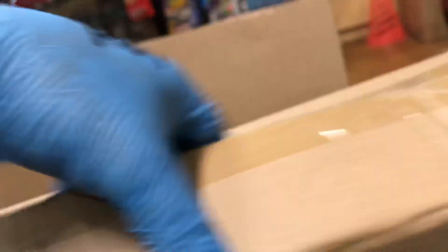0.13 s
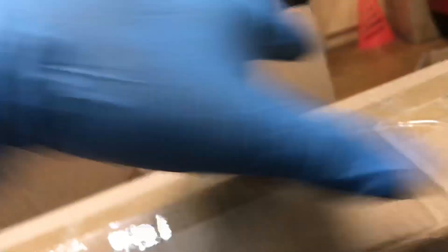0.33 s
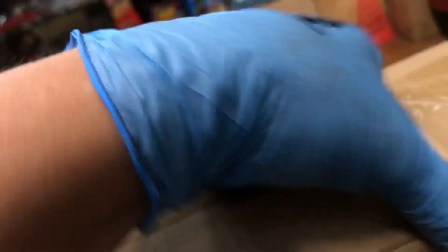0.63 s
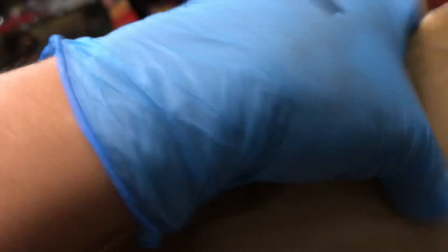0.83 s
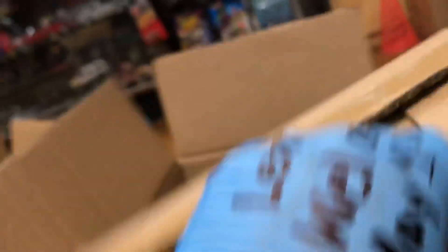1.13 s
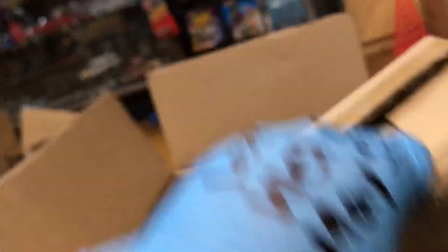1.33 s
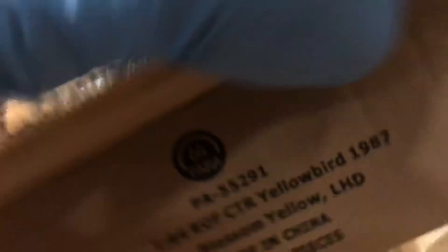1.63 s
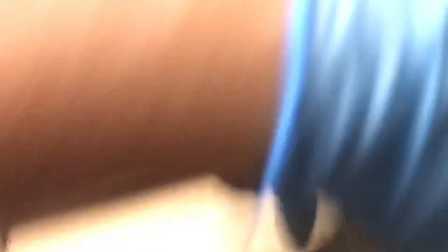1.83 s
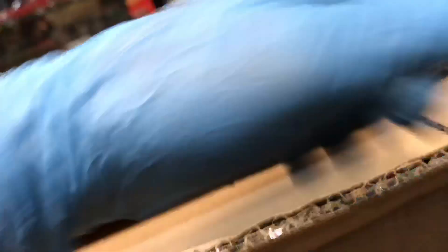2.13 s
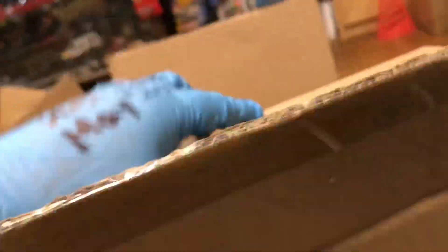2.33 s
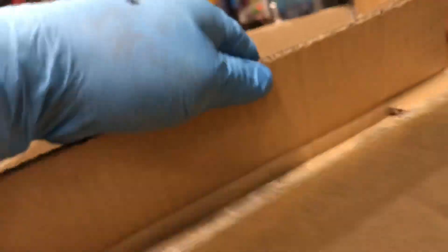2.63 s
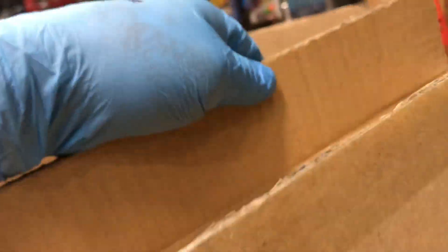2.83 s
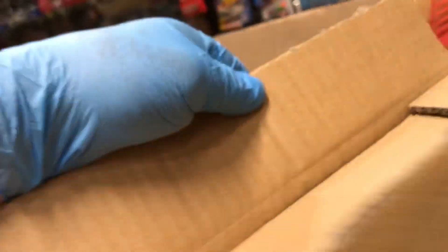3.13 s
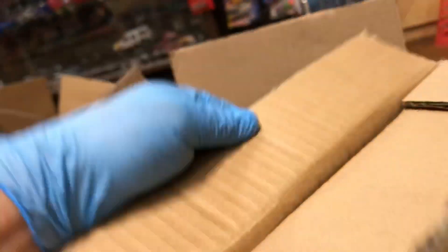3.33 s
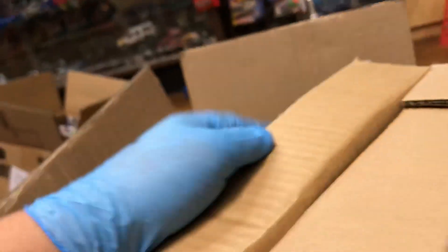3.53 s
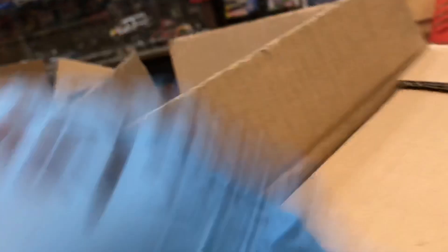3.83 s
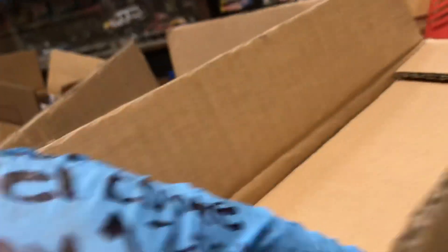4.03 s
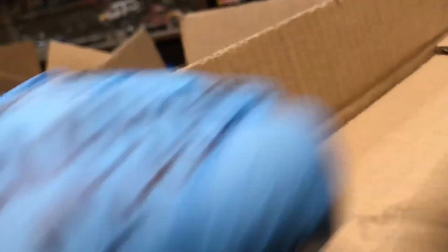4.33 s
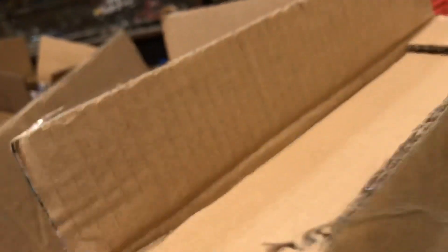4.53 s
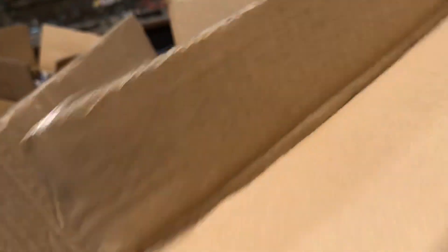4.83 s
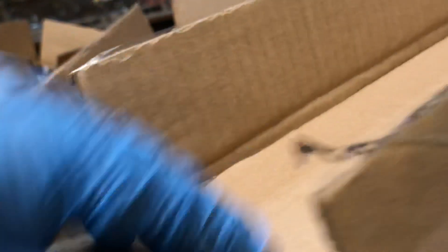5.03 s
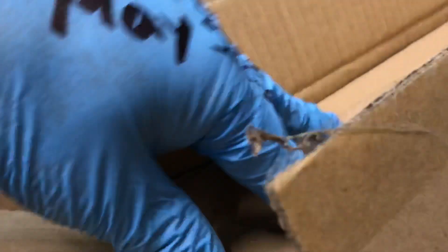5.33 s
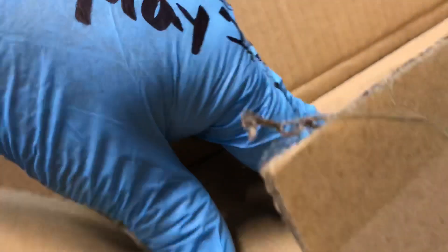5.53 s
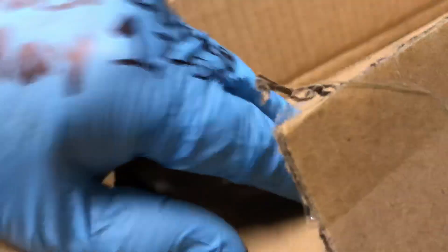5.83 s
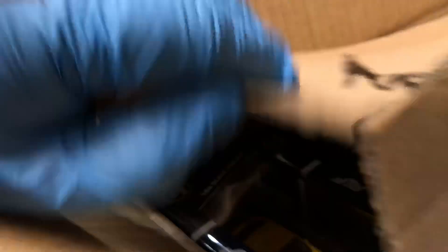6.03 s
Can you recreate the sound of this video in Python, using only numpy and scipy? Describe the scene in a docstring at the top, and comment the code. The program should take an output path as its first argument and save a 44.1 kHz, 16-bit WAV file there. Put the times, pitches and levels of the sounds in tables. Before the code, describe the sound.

Very close, dry mono sound of rubber gloves handling a cardboard carton in a quiet indoor room. Fast rubbing strokes come with hollow low knocks and papery snaps, strongest near one and two seconds. Short rubbery squeaks and softer slides follow, with small gaps. A loud, bright scrape bursts out after four seconds, then lighter scuffs and a final hissing rub. Faint air noise and low hum remain underneath.

```python
"""Gloved hands in a cardboard carton

Gloved hands work through a cardboard carton close to the microphone, in a quiet room.
Rubber slides over the board as a dense hiss of tiny catches; the walls rumble and thump at their modes.
Tape and creases snap as short noise bursts, and a sticking, slipping finger squeaks in gliding tones.
Faint ticks of relaxing creases, a short room tail, air noise and a low hum lie under it all."""
import sys
import numpy as np
from scipy import signal
from scipy.io import wavfile
from scipy.ndimage import uniform_filter1d

SR = 44100
rng = np.random.default_rng(int(sys.argv[2]) if len(sys.argv) > 2 else 0)


def put_to_file(sound):
    """Save the sound as 16-bit audio at rate SR, in the file named by the first command-line argument."""
    columns = np.atleast_2d(sound).T  # one column per channel
    safe = np.clip(columns, -1, 1)
    whole_steps = np.round(safe * 32767)
    wavfile.write(sys.argv[1], SR, whole_steps.astype(np.int16))


N = 272273   # samples

# air noise of the room, relative spectrum: pitch_hz, level_db per Hz
AIR_SPECTRUM = [(18, -41.5), (30, -8.5), (139, 1.5), (181, -13), (268, -13), (493, -27), (1240, -23),
                (1490, -30), (1940, -25.5), (15200, -32.5), (16500, -37)]
# steady hum tones ahead of the microphone: pitch_hz, rms_db
HUM_TONES = [(59, -63), (119, -60.5)]
# modes of the carton walls: pitch_hz, t60_s, gain_db
WALL_MODES = [(54.6, 0.064, 0.5), (80.4, 0.077, 1), (137.2, 0.064, 1), (197, 0.057, -4),
              (252.7, 0.036, -1.5), (305, 0.038, 1.5), (376, 0.043, -1.5), (500, 0.02, -8), (690, .05, -24),
              (950, .04, -17.5)]
# shoves against the walls: strongest_s, drive_db, held_s
SHOVES = [(0.0, -46, .1), (0.2, -24, .07), (0.32, -31, .02), (0.39, -40, .07), (0.57, -29, .01),
          (0.63, -35, .02), (0.7, -26, .04), (0.82, -35, .03), (0.89, -19, .05), (0.99, -27, .01),
          (1.06, -30, .06), (1.17, -28, .005), (1.262, -18, .03), (1.46, -15, .02), (1.35, -33, .06),
          (1.56, -33, .06), (1.8, -41, .01), (1.84, -24, .06), (1.94, -13, .05), (2.07, -29, .06),
          (2.2, -38, .04), (2.37, -25, .02), (2.46, -31, .01), (2.52, -33, .06), (2.65, -39, .03),
          (2.71, -33, .04), (3.33, -45, .02), (3.5, -30, .01), (3.6, -40, .03), (3.8, -36, .005),
          (3.93, -36, .005), (4.13, -42, .24), (4.4, -37, .03), (4.54, -41, .25), (4.83, -39, .08),
          (5.02, -22, .02), (5.16, -37, .04), (5.24, -29, .01), (5.32, -40, .06), (5.45, -34, .01),
          (5.53, -35, .005), (5.91, -42, .2), (6.14, -28, .005)]
# bumps on the walls: start_s, drive_db, struck_pitch_hz, contact_s
BUMPS = [(0.191, -21.5, 93, 0.0011), (0.231, -16.5, 172, 0.0029), (0.258, -19, 70.0, 0.0014),
         (0.282, -20.5, 110, 0.0016), (0.31, -21, 51.1, 0.002), (0.519, -22.5, 96, 0.0038),
         (0.553, -20, 148, 0.0015), (0.59, -25.5, 91.5, 0.0022), (0.695, -17.5, 283, 0.00069),
         (0.861, -9.5, 132, 0.004), (0.881, 2, 189, 0.0022), (0.908, -28, 124, 0.0023),
         (0.95, -10.5, 76.4, 0.0014), (0.977, -10.5, 66, 0.0022), (1.16, -17, 86.1, 0.0036),
         (1.256, -11, 91.5, 0.0021), (1.281, -15, 137, 0.0047), (1.446, -14, 147, 0.0018),
         (1.469, -21, 149, 0.0016), (1.834, -21.5, 103, 0.0032), (1.895, -8.5, 360, 0.0015),
         (1.912, -11, 168, 0.0015), (1.938, -6.5, 188, 0.0018), (1.948, -7.5, 93.5, 0.0018),
         (1.962, -9, 110, 0.0018), (1.983, -11.5, 86.1, 0.0024), (2.005, -15, 83.4, 0.002),
         (2.1, -27, 114, 0.0023), (2.368, -15, 270, 0.0018), (2.3755, -12, 170, 0.002),
         (2.442, -19.5, 91.5, 0.0018), (2.578, -25, 66.6, 0.0026), (3.254, -33, 334, 0.0012),
         (3.792, -20, 124, 0.00067), (3.921, -22, 130, 0.0013), (3.939, -19, 68, 0.0011),
         (3.979, -15.5, 124, 0.0033), (5.017, -19, 56.5, 0.0017), (5.045, -22, 51.4, 0.0033),
         (5.07, -13.5, 61, 0.003), (5.231, -19, 230, 0.0013), (5.416, -30, 156, 0.0019),
         (6.137, -32, 69.5, 0.002)]
# snaps and scuffs of tape and creases: start_s, peak_db, centre_hz, t60_s, bright_crack_db (gain)
SNAPS = [(0.084, -16, 1100, 0.017, -13), (0.232, -21, 710, 0.025, -35), (0.312, -18.5, 5950, 0.023, 7),
         (0.511, -26.5, 1090, 0.019, -6), (0.559, -22, 837, 0.021, -10), (0.581, -33, 5000, 0.012, -3),
         (0.587, -28, 4000, 0.015, -3), (0.592, -25, 1210, 0.018, -20), (0.615, -31, 3450, 0.015, -10),
         (0.6355, -14, 5500, 0.014, -1), (0.649, -26, 4500, 0.04, -3), (0.66, -26, 3200, 0.015, -5),
         (0.688, -27, 4500, 0.01, -2), (0.697, -15, 700, 0.025, -16), (0.707, -20, 5000, 0.03, -2),
         (0.713, -17, 650, 0.017, -11), (0.768, -24, 2060, 0.011, -6.5), (0.779, -12, 950, 0.012, -10),
         (0.884, -0.5, 665, 0.024, -17.5), (1.02, -26.5, 3680, 0.033, -12), (1.159, -17, 3240, 0.022, -2),
         (1.255, -17, 780, 0.058, -11.5), (1.444, -31, 810, 0.033, -13), (1.472, -7.5, 820, 0.011, 0),
         (1.836, -9.5, 805, 0.018, -15), (1.858, -13, 4000, 0.01, -12), (1.896, -22.5, 1430, 0.036, -14),
         (1.937, -13.5, 620, 0.041, -13.5), (1.943, -5, 675, 0.034, -18), (1.982, -16.5, 930, 0.035, -18),
         (2.369, -22.5, 750, 0.058, -15.5), (2.948, -48, 5300, 0.032, -5), (3.691, -29, 4000, 0.033, -5),
         (3.715, -25, 8000, 0.03, 4), (3.734, -22, 1770, 0.017, -15.5), (3.775, -25, 6860, 0.036, -2),
         (3.791, -13, 4370, 0.016, -15), (3.92, -36, 1280, 0.03, -9), (3.927, -23.5, 950, 0.09, -10.5),
         (4.014, -30.5, 1320, 0.043, -13), (4.039, -27.5, 1310, 0.036, -5),
         (4.413, -10.5, 1170, 0.037, -10), (4.67, -25.5, 5360, 0.026, 4), (4.695, -28.5, 2290, 0.034, -1),
         (4.822, -24, 3000, 0.03, -3), (5.025, -28, 1540, 0.036, -9), (5.177, -27, 5880, 0.055, -1),
         (5.232, -12, 1860, 0.018, -14), (5.411, -33, 680, 0.015, -13), (5.428, -25.5, 837, 0.011, -4),
         (5.476, -31, 1020, 0.073, -8), (5.8, -30, 2660, 0.017, -12), (5.886, -28, 6000, 0.017, -1),
         (5.908, -26, 920, 0.022, -6), (5.924, -26, 12000, 0.014, -9), (5.931, -19, 934, 0.016, -9)]
# stick-slip squeaks: start_s, end_s, first_hz, middle_hz, last_hz, drive_db, fall_db (for each overtone)
SQUEAKS = [(0.764, 0.773, 2400, 1900, 1050, -30, 15), (0.772, 0.786, 1300, 850, 620, -27, 7.5),
           (0.772, 0.791, 1700, 2250, 2070, -32, 20), (0.792, .815, 2400, 1750, 520, -28, 15),
           (0.807, .826, 2500, 2030, 1515, -34, 20), (1.065, 1.113, 310, 427, 435, -29, 18),
           (1.113, 1.142, 483, 522, 443, -39.5, 5), (2.572, 2.58, 540, 820, 800, -32, 19),
           (2.579, 2.614, 538, 660, 560, -31, 18), (2.73, 2.754, 815, 790, 760, -42.5, 18),
           (3.328, 3.357, 298, 305, 307, -36.5, 4), (3.456, 3.49, 653, 655, 543, -36, 16),
           (3.487, 3.529, 325, 299, 292, -28, 13), (3.522, 3.559, 373, 364, 330, -22, 48),
           (3.579, 3.596, 1010, 1105, 1530, -30.5, 16), (4.439, 4.488, 762, 654, 598, -33.5, 2.5)]
# strokes of glove on board: touch_s, crest_s, lift_s, crest_hiss_db (before the rubbing mix),
# swell_db (crest over touch), fade_db (crest over lift), sheen_db and board_db (against the hiss),
# board_resonance_hz
STROKES = [(0.0, 0.04, 0.085, -39.5, 1.0, 1.0, 5.0, 8, 1000.0),
           (0.085, 0.15, 0.2, -37.0, 0.0, 0.0, 1.5, -6.5, 1250.0),
           (0.2, 0.23, 0.244, -40.0, 0.5, 0.0, 1.5, -0.5, 750.0),
           (0.244, 0.318, 0.325, -38.0, 5.5, 6.5, 0.5, -0.5, 900.0),
           (0.325, 0.349, 0.42, -53.0, 0.0, 19.5, 6.0, -1.5, 735.0),
           (0.506, 0.687, 0.698, -40.5, 10.5, 1.0, 0.0, 1.0, 950.0),
           (0.698, 0.708, 0.76, -33.0, 5.5, 9.5, -1.0, 0.5, 705.0),
           (0.76, 0.778, 0.828, -33, 5, 7, 7, 4, 1800),
           (0.83, 0.86, 0.883, -39.0, 3.0, 0.0, -1.0, -1.0, 670.0),
           (0.883, 0.886, 0.91, -23.5, 2, 13.0, -6.5, 11.0, 660.0),
           (0.91, 0.95, 1.02, -37.5, 0.5, 3.0, 3.0, 1.0, 680.0),
           (1.02, 1.11, 1.206, -36.0, 7.5, 2.5, 5.5, -2.0, 500.0),
           (1.206, 1.3, 1.312, -35.0, 5.0, 3.5, 4.0, 0.5, 800.0),
           (1.312, 1.32, 1.375, -46.5, 0.5, 13.0, 2.0, 2.0, 930.0),
           (1.375, 1.48, 1.5, -35.5, 10.5, 5.0, -1.5, 0.0, 870.0),
           (1.5, 1.594, 1.662, -48.0, 0.0, 22.0, 8.5, 3.0, 800.0),
           (1.662, 1.67, 1.72, -61.0, 0.0, 9.0, -4.5, 8.5, 800.0),
           (1.72, 1.796, 1.832, -44.5, 22.0, 2.5, -4.5, 2.5, 810.0),
           (1.833, 1.84, 1.917, -31.0, 0.0, 6.0, -1.0, 1.0, 590.0),
           (1.917, 1.939, 2.035, -29.5, 10.0, 20.0, -1.5, 7.5, 620.0),
           (2.035, 2.128, 2.355, -44.0, 0.5, 2.0, 5.0, -2.5, 1050.0),
           (2.355, 2.375, 2.526, -43.5, 0.0, 0.0, 4.5, -2.0, 600.0),
           (2.526, 2.598, 2.66, -34.0, 10.0, 9.5, 7.0, 2.0, 670.0),
           (2.66, 2.764, 2.78, -37.5, 6.0, 12.5, -1.0, -0.5, 1000.0),
           (2.78, 2.84, 2.915, -42.0, 2.5, 5.5, -2.0, 5, 1750.0),
           (2.915, 2.92, 2.96, -60.0, 0.0, 11.5, -3.5, 8.5, 900.0),
           (3.048, 3.193, 3.3, -44.5, 12.0, 2.0, -2.5, -0.5, 1100.0),
           (3.3, 3.348, 3.402, -37.5, 6.0, 1.5, 2.5, 6.5, 1060.0),
           (3.402, 3.52, 3.655, -36.5, 3.5, 16.0, -3.0, 5.5, 800.0),
           (3.655, 3.798, 3.812, -39.0, 16.0, 3.5, 4.0, -1.5, 1450.0),
           (3.812, 3.862, 3.918, -40.0, 2.5, 28.5, 6.0, 0.0, 1260.0),
           (3.918, 3.928, 3.96, -31.5, 11.0, 23.0, -6.5, 8.5, 1100.0),
           (3.96, 4.04, 4.07, -47.0, 8.0, 6.5, -7.5, 0.5, 1150.0),
           (4.07, 4.186, 4.226, -42.0, 11.5, 0.0, -4.0, 1.5, 1100.0),
           (4.226, 4.26, 4.265, -26, 15, 0, 1, -10, 1600),
           (4.265, 4.32, 4.37, -14.5, 10, 5, 2.5, -14, 1900),
           (4.37, 4.38, 4.423, -21, 0, 2, 5.0, -8.0, 1800.0),
           (4.425, 4.459, 4.55, -38.0, 0.0, 17.0, 5.5, -0.5, 870.0),
           (4.55, 4.64, 4.668, -33.5, 20.5, 17.0, -1.5, -6.0, 1400.0),
           (4.668, 4.75, 4.81, -51.5, 0.0, 6.0, -2.5, 0.5, 1150.0),
           (4.81, 4.888, 4.99, -45.0, 2.0, 1.5, -5.0, -2.5, 750.0),
           (4.99, 5.068, 5.124, -37.0, 13.0, 13.5, 9.0, -7.5, 1130.0),
           (5.124, 5.24, 5.256, -34.5, 19.5, 5.0, 6.0, -4.5, 1600.0),
           (5.256, 5.262, 5.38, -38.5, 1.5, 24.0, 4.5, -2.0, 1600.0),
           (5.39, 5.418, 5.5, -47.0, 21.0, 31.0, -11.5, -1.5, 1140.0),
           (5.516, 5.528, 5.57, -37.0, 29.5, 37.5, 7.0, -7.0, 1180.0),
           (5.62, 5.7, 5.725, -67.0, 7.0, 4.0, -6.5, 9.5, 1300.0),
           (5.725, 5.792, 5.87, -48.5, 7.0, 0.0, 5.5, -3.5, 1530.0),
           (5.87, 5.88, 5.93, -42.5, 1.5, 1.5, -0.5, -3.0, 1120.0),
           (5.932, 5.966, 6.018, -29.0, 3.5, 1.0, 6.0, -10.5, 1600.0),
           (6.018, 6.106, 6.174, -25.0, 8.5, 5.0, 11.0, -6.0, 1500.0)]
# glove hiss, relative spectrum: pitch_hz, level_db per Hz
GLOVE_SPECTRUM = [(650, -40.5), (1100, -6), (1460, -15), (1730, -9.5), (2070, -5), (3700, -2.5), (4380, -4),
                  (6160, -2.5), (7720, -7), (8650, -4), (12700, -4), (15600, -4.5), (16500, -36)]
# duller voice of the board, relative spectrum: pitch_hz, level_db per Hz
BOARD_SPECTRUM = [(120, -33.5), (200, -7.5), (312, -1.5), (457, -4), (588, -3), (926, -5.5), (1210, -8),
                  (1570, -3.5), (2890, -18.5), (3500, -10), (4550, -58), (7700, -120)]

AIR_DB = -57   # rms ahead of the microphone
ROOM_T60_S, ROOM_ECHO_DB = 0.29, -30
SETTLING_PER_S, SETTLING_DB = 40, -66   # faint ticks of creases relaxing, also while the hands rest
SHOVE_RISE_DB_PER_S, SHOVE_FALL_DB_PER_S = 450, 220
RUB_SHAKES_DB = -12   # rumble drive that the sliding hand adds, against the board voice
CUTOFF_HZ = 15750
SPARSE_STEP = 20   # samples between points of a slow curve


def from_db(db):
    """Decibels to gain."""
    return 10 ** (np.asarray(db) / 20)


def rms_one(x):
    """Scale to unit rms."""
    return x / np.sqrt(np.mean(x ** 2) + 1e-20)


def lift(hz, centre_hz, height_db, octaves):
    """A bell-shaped boost in dB around a centre."""
    return height_db * np.exp(-.5 * (np.log2(hz / centre_hz) / octaves) ** 2)


def butter_filter(x, order, hz, kind):
    """Butterworth filter."""
    return signal.sosfilt(signal.butter(order, hz, kind, fs=SR, output="sos"), x)


def sparse_drift(rate_hz):
    """Smoothed chance of unit rms, one point per sparse step."""
    count, warm_up = N // SPARSE_STEP, 2000
    r = np.exp(-2 * np.pi * rate_hz * SPARSE_STEP / SR)
    chance = rng.standard_normal(count + warm_up + 2)
    wander = signal.lfilter([1], [1, -2 * r, r * r], chance)
    return rms_one(wander[warm_up:warm_up + count])


def fill(sparse):
    """Join the sparse points into a curve at every sample."""
    return np.interp(np.arange(N) / SPARSE_STEP, np.arange(len(sparse)), sparse)


def drift(rate_hz):
    """Smoothed chance at every sample."""
    return fill(sparse_drift(rate_hz))


def grit(per_s, spread_db):
    """Tiny catches at random moments, of uneven size and random sign; rms 1."""
    sizes = from_db(spread_db * np.minimum(rng.exponential(1, N), 5))
    signs = rng.choice([-1, 1], N)
    return rms_one(sizes * signs * (rng.random(N) < per_s / SR))


def coloured(sources, spectrum, patchy_db, flicker_hz, per_octave=3, centre_hz=1, lift_db=0):
    """Narrow bands at the spectrum's levels, each wavering on its own, lifted near a moving centre; rms 1."""
    hz, db = np.transpose(spectrum)
    edges = hz[0] * 2 ** np.arange(0, np.log2(hz[-1] / hz[0]) + .3, 1 / per_octave)
    out = 0
    for k, (low, high) in enumerate(zip(edges, np.minimum(edges[1:], .45 * SR))):
        band = butter_filter(sources[k % 2], 2, [low, high], "band")   # neighbours use different sources
        middle = np.sqrt(low * high)
        level_db = np.interp(np.log(middle), np.log(hz), db) + lift(middle, centre_hz, lift_db, 0.39)
        out = out + band * fill(from_db(level_db + patchy_db * sparse_drift(flicker_hz)))
    return rms_one(out)


def room_tone():
    """Steady air noise and a hum of pure tones."""
    air = coloured(rng.standard_normal((2, N)), AIR_SPECTRUM, patchy_db=0, flicker_hz=5)
    t = np.arange(N) / SR
    hum = sum(np.sqrt(2) * from_db(db) * np.sin(2 * np.pi * hz * t) for hz, db in HUM_TONES)
    return from_db(AIR_DB) * air + hum


def room(x):
    """A short diffuse tail that starts after the first walls: decaying noise, dulled on top."""
    t = np.arange(round(.4 * SR)) / SR
    tail = rng.standard_normal(len(t)) * from_db(-60 * t / ROOM_T60_S) * (t > .006)
    tail = signal.lfilter(*signal.butter(1, 5000, fs=SR), tail)
    return signal.fftconvolve(x, tail / np.sqrt(np.sum(tail ** 2)))[:N]


def settling():
    """Relaxing creases give sparse thin ticks, each a few milliseconds of dying noise."""
    envelope = signal.lfilter([1], [1, -.97], grit(SETTLING_PER_S, 3.0) ** 2) ** .5
    ticks = envelope * rng.standard_normal(N)
    return from_db(SETTLING_DB) * rms_one(butter_filter(ticks, 2, [1800, 12000], "band"))


def panels(force):
    """The carton's walls ring at their modes, each a decaying resonator driven by its own force."""
    out = 0
    for (hz, t60, db), push in zip(WALL_MODES, force):
        r, w = from_db(-60 / (t60 * SR)), 2 * np.pi * hz / SR
        strike = [0, from_db(db) * np.sin(w)]
        out = out + signal.lfilter(strike, [1, -2 * r * np.cos(w), r * r], push + 1e-18)
    return out


def shaking(board):
    """Uneven shoves and the sliding hand rumble the walls; shoves share one rise and one fall rate."""
    t = np.arange(0, N + 50, 50) / SR
    strongest, db, held = np.transpose(SHOVES)[:, :, None]
    rise_db = SHOVE_RISE_DB_PER_S * np.maximum(strongest - t, 0)
    fall_db = SHOVE_FALL_DB_PER_S * np.maximum(t - strongest - held, 0)
    shove_power = np.sum(from_db(db - rise_db - fall_db) ** 2, axis=0)
    power = np.interp(np.arange(N) / SR, t, shove_power)
    level = np.sqrt(power + (from_db(RUB_SHAKES_DB) * board) ** 2)
    # two rough forces, taken in turn by the modes
    pushes = [grit(300, 2.0), grit(300, 1.8)]
    unshaped_rms = np.sqrt(np.mean(panels(pushes * len(WALL_MODES)) ** 2))
    walls = panels([push * level for push in pushes] * len(WALL_MODES)) / unshaped_rms
    return from_db(-6.5) * butter_filter(walls, 2, 300, "low")


def bumps():
    """A half-sine push; short contact reaches the higher modes, and those near the struck pitch ring most."""
    force, modes_hz = np.zeros((len(WALL_MODES), N)), np.transpose(WALL_MODES)[0]
    spot = from_db(rng.normal(0, 3, (len(BUMPS), len(WALL_MODES))))   # chance share of each mode
    facing = (-1) ** np.arange(len(WALL_MODES))   # neighbouring modes push the air in opposite senses
    for (start, db, hz, contact), share in zip(BUMPS, spot):
        push = np.sin(np.pi * np.arange(0, 1, 1 / (contact * SR)))
        share = share * facing * from_db(db - 12 + lift(modes_hz, hz, 12, 0.35))
        at = round(start * SR)
        force[:, at:at + len(push)] += np.outer(share, push / push.sum())
    return panels(force)


def snaps():
    """Each snap is a dying burst, band-limited around its centre with a bright crack mixed in."""
    length = 4000
    out, t = np.zeros(N + length), np.arange(length) / SR
    noise = rng.standard_normal((len(SNAPS), length))
    for (start, db, hz, t60, crack_db), burst in zip(SNAPS, noise):
        onset = np.minimum(t / (0.02 * t60 + 1e-4), 1)   # longer scuffs set in softer
        burst = burst * from_db(-60 * t / t60) * onset
        core = butter_filter(burst, 2, [hz / 1.55, hz * 1.39], "band")
        crack = signal.lfilter(*signal.butter(1, 1500, "high", fs=SR), burst)
        sound = core + from_db(crack_db) * crack
        at = round(start * SR)
        out[at:at + length] += from_db(db) * sound / np.abs(sound).max()
    return out[:N]


def squeaks():
    """Regular slips give a short gliding tone with overtones and unsteady pitch and strength."""
    out, waver, rasp = np.zeros(N), drift(73), drift(400)
    for start, end, first_hz, middle_hz, last_hz, db, fall_db in SQUEAKS:
        at = np.arange(round(start * SR), round(end * SR))
        along = np.linspace(0, 1, len(at))
        glide = np.interp(along, [0, .5, 1], [first_hz, middle_hz, last_hz])
        phase = 2 * np.pi * np.cumsum(glide * (1 + 0.018 * waver[at])) / SR
        tone = 0
        for k in range(6):
            # each partial wavers by a shifted copy of the same drift
            partial_db = -fall_db * k + 2.2 * np.roll(waver, 900 * k + 500)[at]
            tone = tone + from_db(partial_db) * np.sin((k + 1) * phase)
        unevenness = from_db(first_hz / 450 * rasp[at])   # faster slips are more uneven
        out[at] += from_db(db) * np.sin(np.pi * along) ** .35 * tone * unevenness
    return out


def stroke_curves():
    """Strokes swell to a crest and fade until the hand lifts; hiss, sheen and board voice move together."""
    t, out = np.arange(N) / SR, np.zeros((4, N))
    out[3] = 1000   # board resonance in Hz between strokes
    for touch, crest, lift_s, db, swell_db, fade_db, sheen_db, board_db, board_hz in STROKES:
        inside = slice(round(touch * SR), round(lift_s * SR))
        hiss_db = np.interp(t[inside], [touch, crest, lift_s], [db - swell_db, db, db - fade_db])
        out[:3, inside] = from_db(hiss_db) * from_db([[0], [sheen_db], [board_db]])
        out[3, inside] = board_hz
    return uniform_filter1d(out, size=89)   # 2 ms smoothing


def rubbing(hiss, sheen, board, board_hz):
    """Friction: glove hiss, its bright top changing with the finger's angle, a duller voice from the board."""
    judder = from_db(0.99 * drift(55) + 1.05 * drift(177))   # grip comes and goes
    crackle = from_db(-6) * grit(90, 6.8)   # single fibres let go
    glove_grit = [grit(15000, 2.1) + crackle, grit(15000, 3.4) + crackle]
    fine = coloured(glove_grit, GLOVE_SPECTRUM, patchy_db=2.4, flicker_hz=12, per_octave=6)
    low = rms_one(butter_filter(fine, 4, 7500, "low"))
    top = rms_one(butter_filter(fine, 4, 7500, "high"))
    # the free length of board under the hand sets a resonance that moves with it
    sparse_hz = board_hz[:N // SPARSE_STEP * SPARSE_STEP:SPARSE_STEP]
    board_grit = [grit(5000, 3.3) + crackle, grit(5000, 5.5) + crackle]
    coarse = coloured(board_grit, BOARD_SPECTRUM, patchy_db=3.5, flicker_hz=6.3,
                      per_octave=6, centre_hz=sparse_hz, lift_db=4.5)
    glove = from_db(-2.5) * hiss * low + from_db(-9.65) * sheen * top
    return judder * (glove + from_db(-3.0) * board * coarse)


def scene():
    """All sources, close and mono, with the room behind them."""
    hiss, sheen, board, board_hz = stroke_curves()
    near = settling() + shaking(board) + bumps() + snaps() + squeaks()
    near = near + rubbing(hiss, sheen, board, board_hz)
    return (room_tone() + from_db(ROOM_ECHO_DB) * room(near) + near)[None]


def record(dry):
    """The microphone drops the deepest bass, rounds the peaks and cuts the top."""
    x = butter_filter(dry, 6, 45, "high")
    x = 1.238 * np.tanh(x / 1.101)
    return signal.sosfilt(signal.ellip(14, .5, 90, CUTOFF_HZ, fs=SR, output="sos"), x)


dry = scene()
out = record(dry)
put_to_file(out)
```